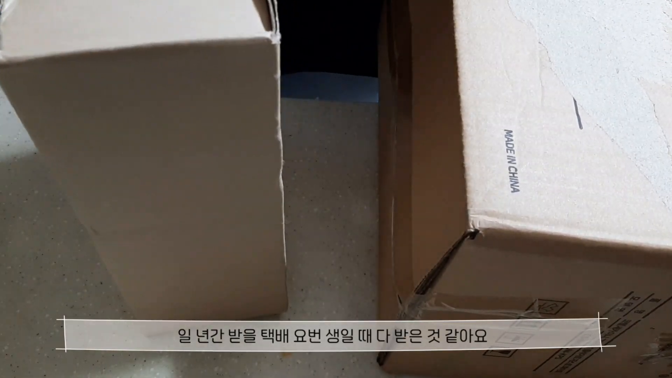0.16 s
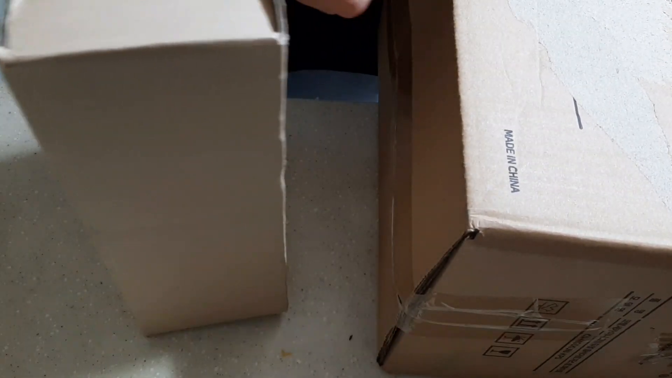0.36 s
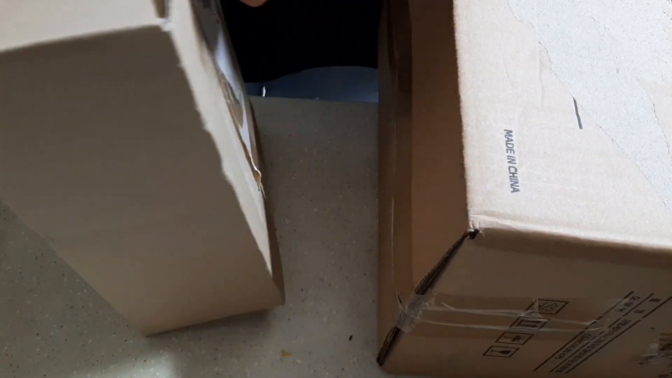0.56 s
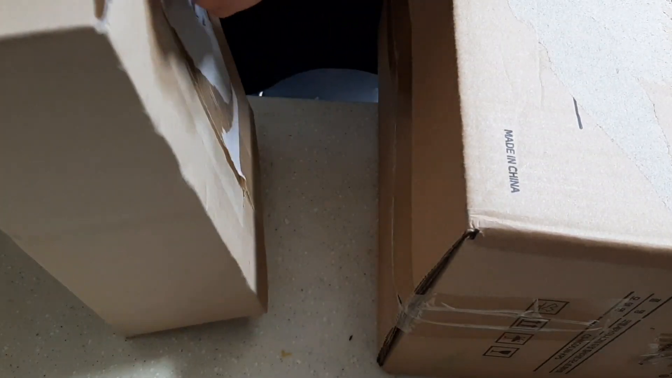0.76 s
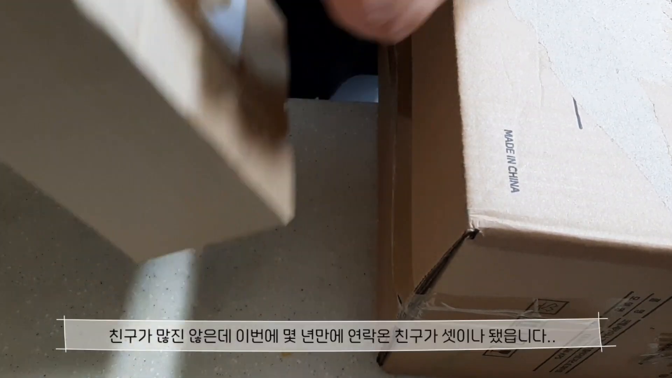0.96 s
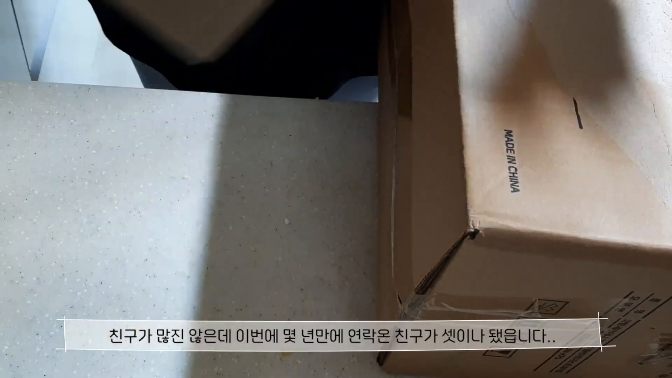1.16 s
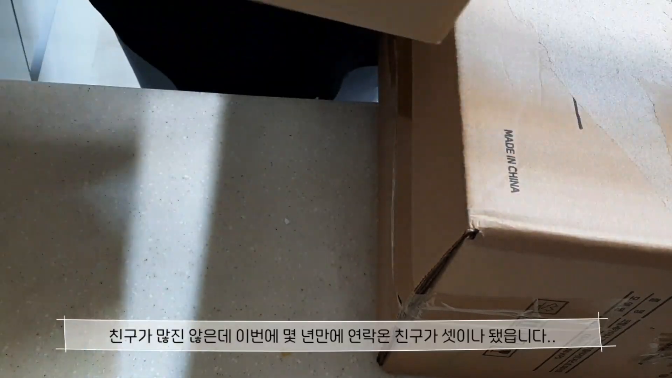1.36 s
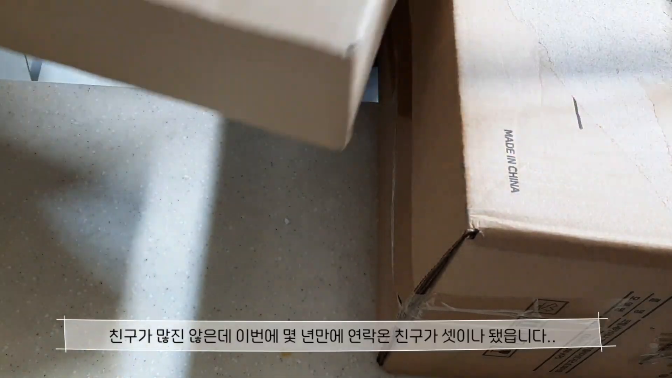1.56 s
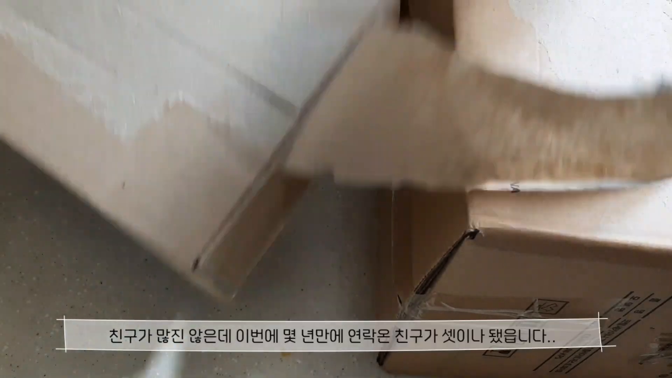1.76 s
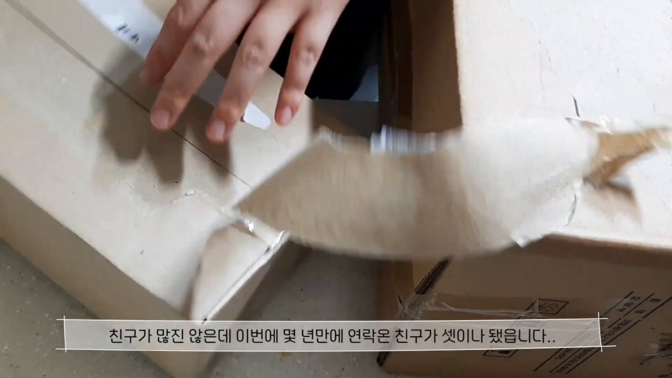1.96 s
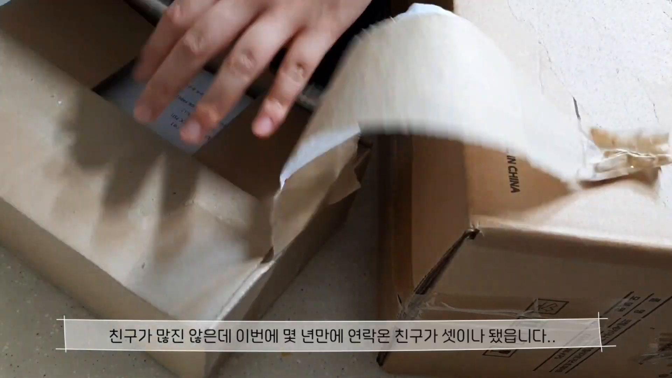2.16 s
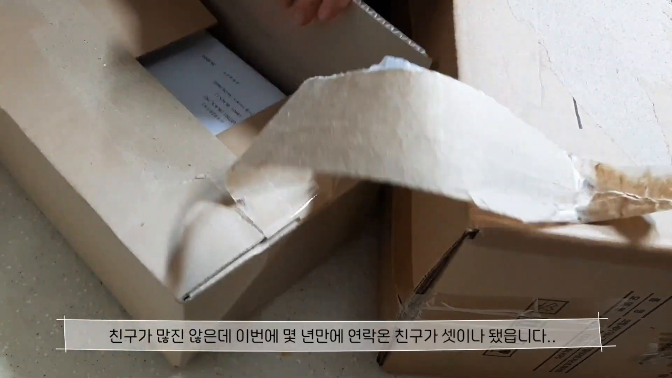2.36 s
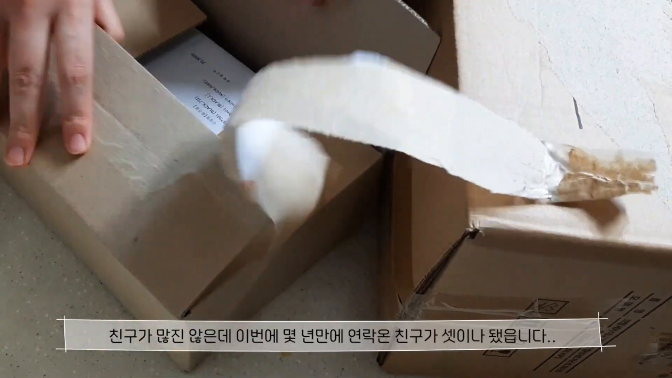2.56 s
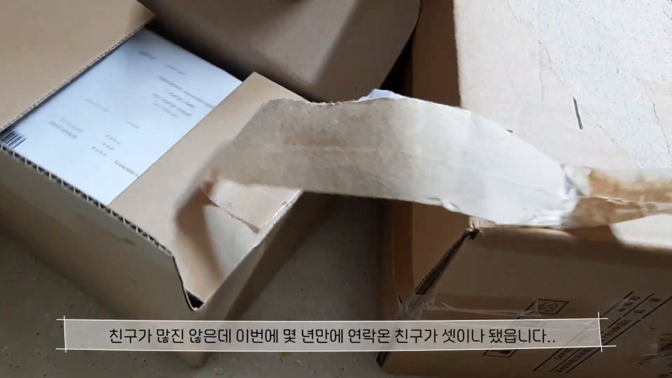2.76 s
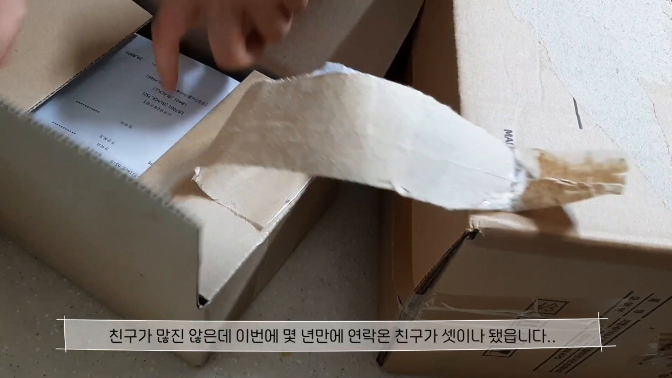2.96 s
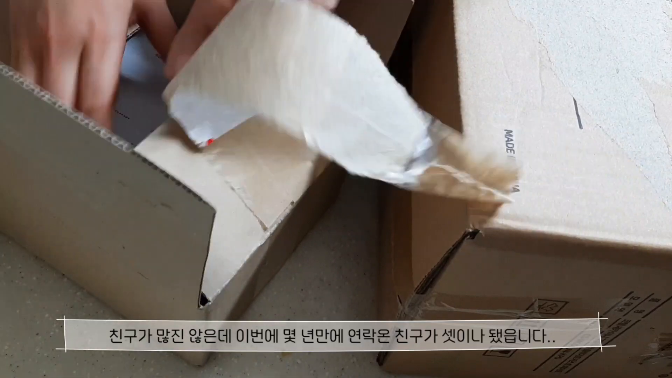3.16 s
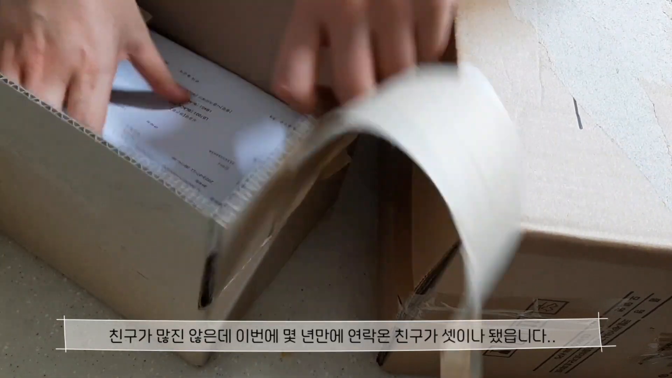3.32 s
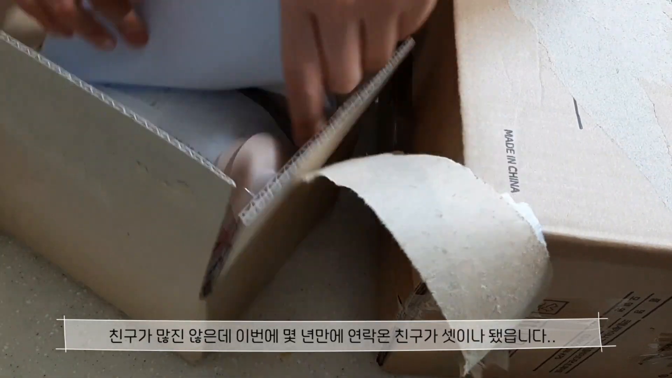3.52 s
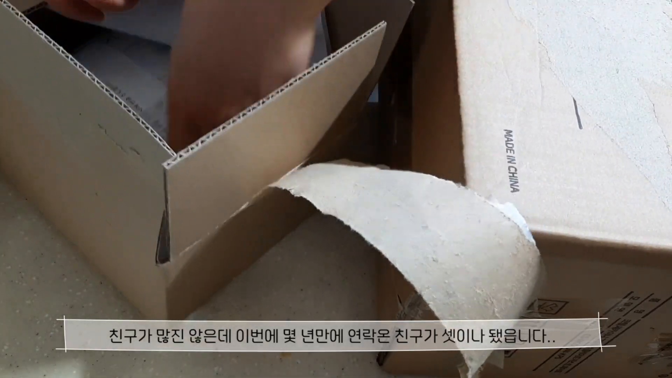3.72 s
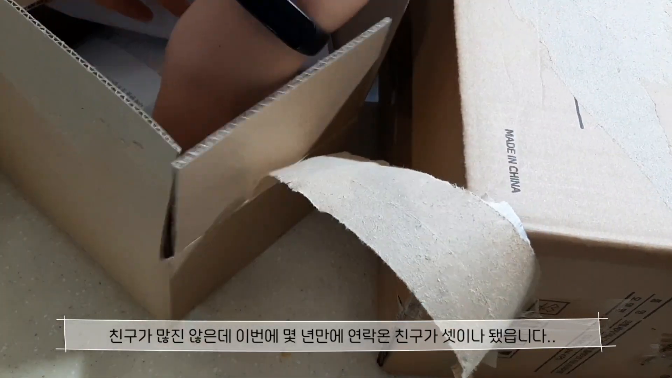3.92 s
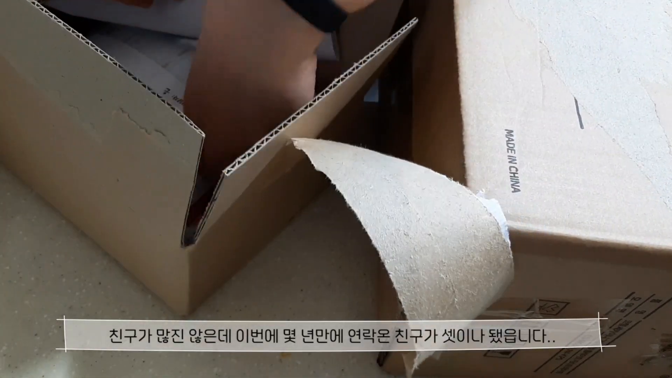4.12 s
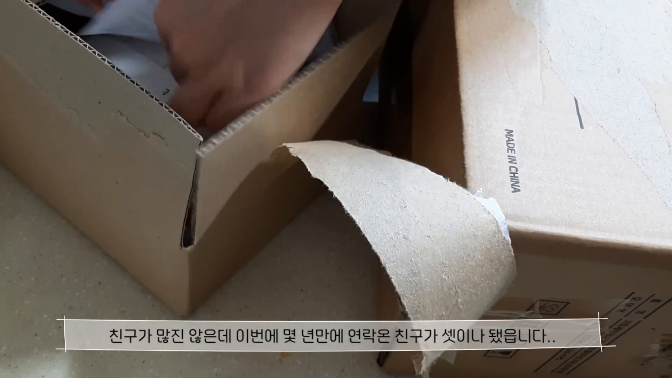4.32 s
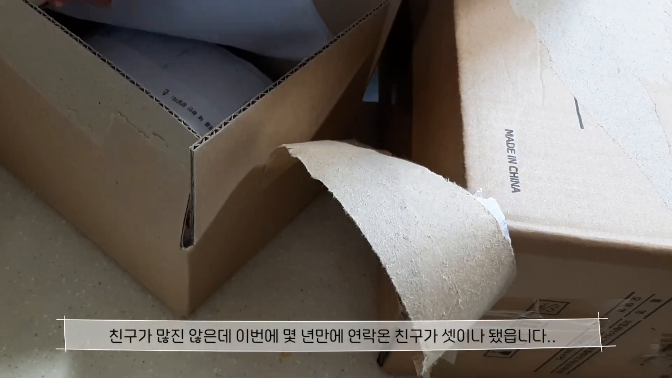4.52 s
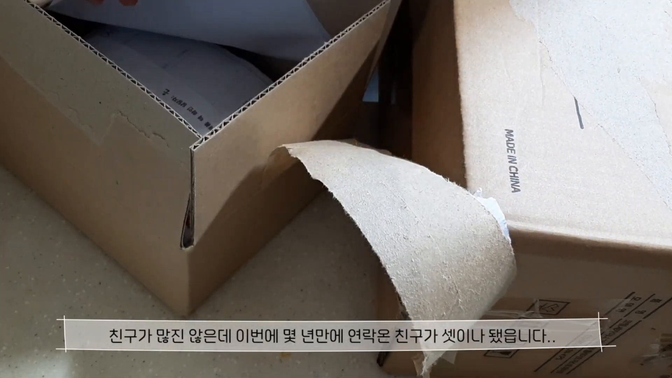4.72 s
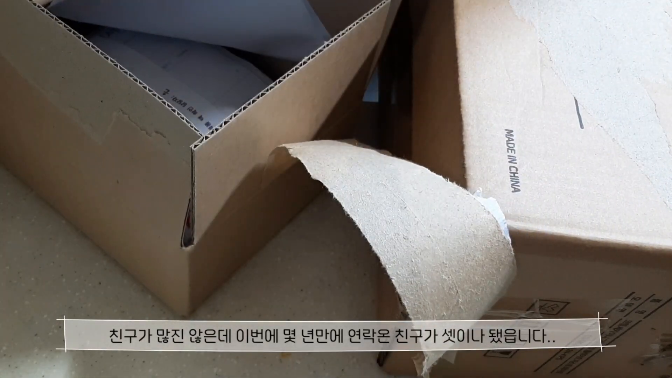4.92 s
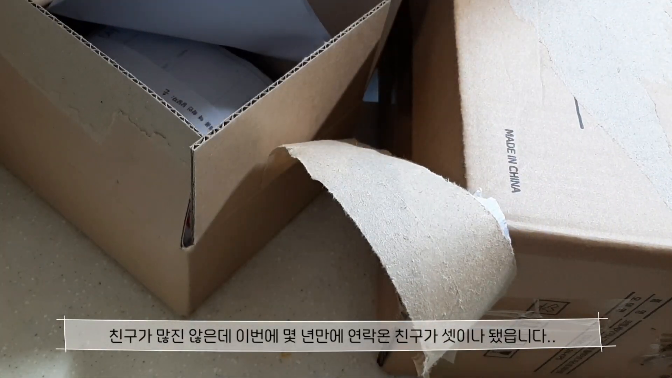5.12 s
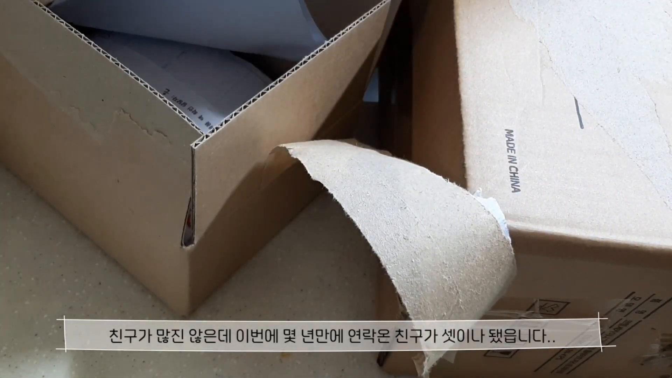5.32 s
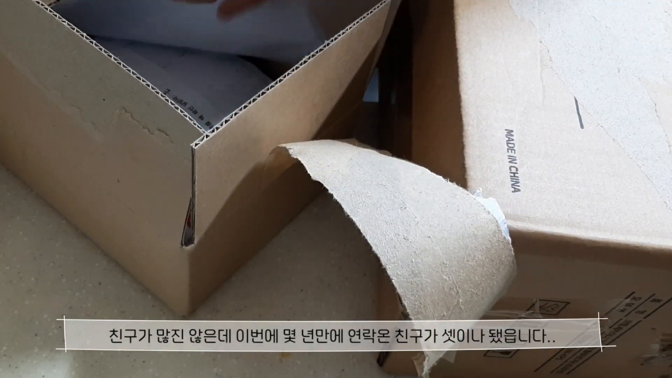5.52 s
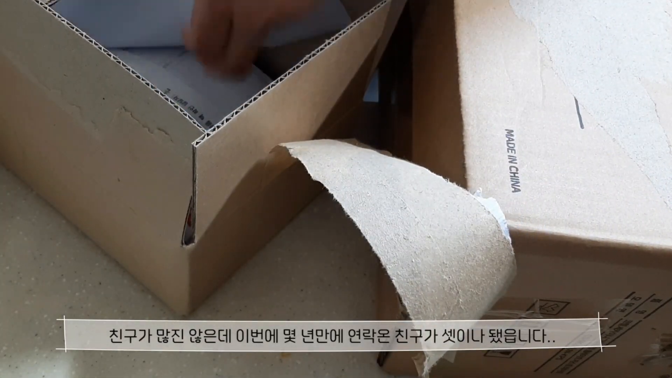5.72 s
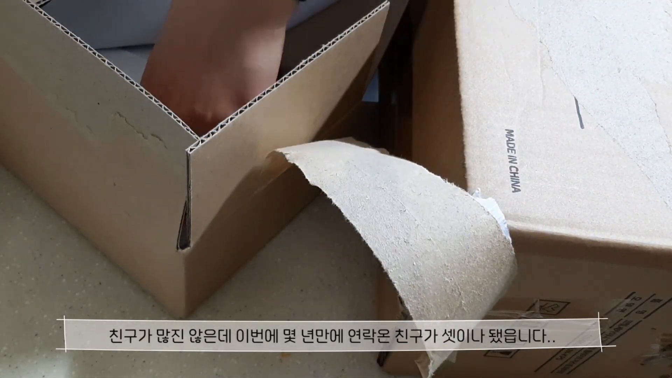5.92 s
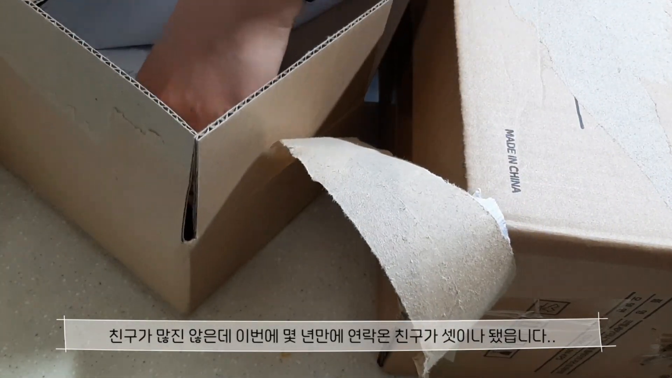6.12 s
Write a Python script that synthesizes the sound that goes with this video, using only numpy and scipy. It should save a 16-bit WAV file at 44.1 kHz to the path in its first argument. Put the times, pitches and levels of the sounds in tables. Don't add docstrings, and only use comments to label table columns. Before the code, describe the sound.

A cardboard box is dragged across a hard floor, thumped and opened with hollow knocks, tape snaps, then papery rustling and crinkling inside, close up.

```python
import sys
import numpy as np
from scipy import signal
from scipy.fft import rfft, irfft, next_fast_len
from scipy.io import wavfile
from scipy.ndimage import uniform_filter1d, map_coordinates

SR = 44100
rng = np.random.default_rng(int(sys.argv[2]) if len(sys.argv) > 2 else 0)


def invert_db(level):
    return 10 ** (np.asarray(level, dtype=float) / 20)


def unload_audio(sound):
    columns = np.transpose(np.atleast_2d(sound))
    steps = np.round(np.clip(columns, -1, 1) * 32767)
    wavfile.write(sys.argv[1], SR, steps.astype(np.int16))


N = 276948


def unit(x):
    return x / np.sqrt(np.mean(x ** 2) + 1e-20)


def steady(x, s):
    return x / np.sqrt(abs(uniform_filter1d(x[0] ** 2, int(s * SR))) + 1e-9)


def along(points, hz):
    f, v = np.transpose(points)
    return np.interp(np.log(hz + 1), np.log(f + 1), v)


def wobble(rate):
    knots = rng.standard_normal(int(N * rate / SR) + 4)
    return map_coordinates(knots, [np.arange(N) * rate / SR])


def filtered(x, response):
    m = next_fast_len(N + 8192)
    return irfft(rfft(x, m) * response(np.fft.rfftfreq(m, 1 / SR)), m)[..., :N]


# (frequency [Hz], left-right correlation [0 to 1])
LIKENESS = [(60, 0.85), (130, 0.96), (290, 0.99), (640, 0.75), (1400, 0.5), (3100, 0.35), (6800, 0.2),
            (15000, 0.1)]


def stereo(pair):
    lead_s = 0.00011

    def turn(hz):
        return np.arccos(np.clip(along(LIKENESS, hz), -1, 1)) / 2

    def shares(hz):
        return np.sqrt(2) * np.array([np.cos(turn(hz)), np.sin(turn(hz))])

    def lead(hz):
        return np.exp(1j * np.pi * np.outer([1, -1], hz * lead_s))

    mid, side = filtered(pair, shares)
    return filtered(np.array([mid + side, mid - side]) / np.sqrt(2), lead)


def strokes(rows):
    slope_db = 20
    peak, swell, fade, db = np.transpose(rows)[:4, :, None]
    t = np.arange(0, N + 32, 32) / SR
    before = np.insert(peak, 0, -1)[:-1, None]
    after = np.append(peak, N)[1:, None]
    away = 1000 * np.maximum((peak - t) / abs(swell), (t - peak) / abs(fade))
    power = invert_db(db - slope_db * away) ** 2 * (t > before) * (t < after)
    return power * power.max(0) / (power.sum(0) + 1e-30)


def summed(power, weight):
    return np.interp(np.arange(N) / 32, np.arange(power.shape[1]), weight @ power + 1e-30)


def fibres(per_s, share, patchy_db):
    catch = (rng.random(N) < per_s / SR) * invert_db(5 * np.minimum(rng.exponential(size=N), 3))
    grip = signal.lfilter([1], [1, -invert_db(-60 / (.006 * SR))], catch)
    z = signal.stft(rng.standard_normal((2, N)), nperseg=512)[2]
    patches = uniform_filter1d(rng.standard_normal(z.shape[1:]), size=5, axis=0)
    patches = uniform_filter1d(patches, size=12, axis=1)
    noise = signal.istft(z * invert_db(patchy_db * unit(patches)), nperseg=512)[1][:, :N]
    return (1 + share * grip) * noise


# (frequency [Hz], density [dB per Hz])
BOOM_SPECTRUM = [(20, -35), (60, -10.5), (120, -3), (250, -4.5), (480, -4.5), (750, -18), (1500, -52)]


def boom(centre_hz):
    lumps = invert_db(4.5 * wobble(70)) * rng.standard_normal((2, N))
    broad = unit(filtered(lumps, lambda f: invert_db(along(BOOM_SPECTRUM, f))))
    out = invert_db(-1.5) * (250 / centre_hz) ** 1.4 * broad
    for hz in (170, 230, 310, 420, 540):
        ring = filtered(lumps, lambda f: 1j * f / (hz * hz - f * f + .17j * f * hz))
        out += np.exp(-(np.log(centre_hz / hz) / 0.24) ** 2) * unit(ring)
    return steady(out, .04)


# (time [s], swell [ms], fade [ms], hiss level [dB], panel rasp over hiss [dB])
FINGER_STROKES = [
    (0.052, 5.2, 110, -68.5, 5),
    (0.336, 8.8, 30, -47.5, -1),
    (0.353, 21, 54, -58, 15),
    (0.463, 3, 90, -67, 21),
    (0.487, 53, 100, -60.5, 17.5),
]
FLOOR_STROKES = [
    (0.617, 140, 700, -60, -6),
    (0.854, 5.3, 55, -47, 3.5),
    (0.912, 200, 100, -49, -11),
    (0.992, 98, 200, -32.5, -2),
    (1.145, 400, 300, -35.5, -0.5),
    (1.2, 300, 250, -34, -3),
    (1.337, 250, 200, -33, -4),
    (1.424, 200, 36, -33, -2),
    (1.52, 400, 200, -71, 3),
]
TAPE_STROKES = [(1.602, 40, 150, -52.5, -11), (1.724, 150, 70, -52.5, -3), (1.897, 12, 250, -57, -2.5),
                (2.017, 9, 100, -59, 16), (2.057, 80, 150, -51, -1.5), (2.108, 5, 120, -46, 9),
                (2.19, 100, 302, -54, 7.5), (2.3, 50, 30, -52, 12.5), (2.404, 200, 75, -51.5, 1.5)]
FLAP_STROKES = [(2.633, 40, 900, -48.5, -2.5), (2.893, 1600, 24, -47, 4), (3.049, 80, 150, -59.5, 7),
                (3.201, 83, 50, -64.5, 20), (3.255, 7.3, 300, -47, 2), (3.316, 140, 900, -41.5, 0.5),
                (3.39, 440, 260, -41, 7.5), (3.46, 200, 200, -45.5, 6), (3.592, 97, 102, -40.5, 4)]
PAPER_STROKES = [(3.73, 21, 300, -66, 19), (3.82, 135, 220, -49, 3), (4.012, 66, 40, -51.5, 7),
                 (4.104, 240, 200, -53, -5), (4.254, 300, 400, -69.5, 13.5), (4.434, 260, 85, -53, 2.5),
                 (4.506, 9, 250, -61, 9.5), (4.583, 6.8, 75, -58, -2), (4.811, 170, 40, -60, 7),
                 (4.917, 8, 58, -56.5, 7), (5.045, 24, 400, -65, 0), (5.098, 300, 30, -63, -2),
                 (5.19, 40, 40, -67, -6), (5.29, 79, 50, -65.5, 1), (5.396, 51, 60, -61, -1)]
WRAP_STROKES = [(5.464, 41, 225, -45, -3), (5.567, 270, 8, -57, 7.5), (5.593, 5, 220, -53, 1.5),
                (5.64, 30, 450, -47, -10), (5.759, 740, 29, -49, 3.5), (5.79, 9, 120, -54, 5),
                (5.922, 66, 50, -43, -2.5), (5.973, 5, 300, -64, 15), (6.06, 21, 200, -59, -4),
                (6.201, 150, 300, -45, 1)]
GLOSS_DB = (-4, -0.5, -5, -3, -6.5, -6)
# (time [s], swell
# [ms], fade [ms], boom level [dB], centre frequency [Hz])
LEANS = [(0.01, 100, 500, -61, 198), (0.336, 5, 300, -47, 305), (0.395, 990, 40, -48.5, 320),
         (0.464, 4, 90, -39, 342), (0.489, 60, 75, -36, 352), (0.63, 100, 3000, -68, 204),
         (0.851, 6.4, 90, -41.5, 196), (0.971, 63, 900, -38, 238), (1.171, 790, 500, -32, 227),
         (1.45, 990, 65, -39.5, 197), (1.721, 100, 90, -51, 250), (1.95, 600, 900, -63, 290),
         (2.016, 5.4, 300, -29, 257), (2.06, 500, 70, -35, 259), (2.109, 5, 60, -23, 310),
         (2.296, 540, 100, -51, 228), (2.394, 170, 90, -39, 284),
         (2.58, 12, 3000, -46, 288), (2.745, 50, 50, -33.5, 358), (2.896, 3000, 40, -46.5, 340),
              (3.05, 160, 350, -47, 322), (3.3, 200, 900, -41.5, 400), (3.47, 220, 80, -33, 320),
              (3.61, 90, 98, -34, 310), (3.74, 27, 200, -43.5, 370), (3.82, 200, 270, -40.5, 338),
              (3.93, 140, 1100, -48.5, 400), (4.51, 1100, 130, -48, 290), (4.72, 55, 900, -59, 318),
              (4.955, 800, 90, -60, 272), (5.072, 150, 3000, -65.5, 290), (5.464, 50, 1500, -49, 285),
              (5.67, 40, 1100, -49.5, 322), (5.973, 3.5, 900, -36.5, 490), (6.04, 900, 59.6, -36, 460),
              (6.17, 180, 3000, -43, 387)]
# (start [s], end [s])
SMOOTH_SLIDE = (0.99, 1.47)
# (frequency [Hz], bandwidth [Hz], level [dB])
PANEL_MODES = [(646, 154, -1), (839, 98, 1.5), (1000, 81, 1), (1200, 127, 1.5), (1528, 95, 6),
               (2033, 140, 3.5), (2600, 680, -5.5)]
# (frequency [Hz], density [dB per Hz])
HISS_SPECTRUM = [(900, -26.5), (2200, -5), (3500, 0.5), (6000, -3), (8500, -4), (10500, -13.5)]
SHEEN_SPECTRUM = [(6500, -8.5), (9000, -5.5), (12500, 2), (16000, -11)]


def rubbing():
    leans = np.array(LEANS)
    weight = strokes(leans)
    shake = summed(weight, np.ones(len(leans)))
    centre_hz = summed(weight, leans[:, -1]) / shake

    surfaces = (FINGER_STROKES, FLOOR_STROKES, TAPE_STROKES, FLAP_STROKES, PAPER_STROKES, WRAP_STROKES)
    rubs = np.concatenate(surfaces)
    effort = strokes(rubs)
    gloss_db = np.repeat(GLOSS_DB, [len(s) for s in surfaces])

    def drive(over_db):
        return np.sqrt(summed(effort, invert_db(over_db) ** 2))

    t = np.arange(N) / SR
    crinkly = 1 - .6 * ((t > SMOOTH_SLIDE[0]) & (t < SMOOTH_SLIDE[1]))
    jerk_db = 1.5 * crinkly * wobble(45)

    def panels(f):
        total = 0
        for k, (centre, width, db) in enumerate(PANEL_MODES):
            mode = 1j * f * width / (centre * centre - f * f + 1j * f * width)
            total = total + (-1) ** k * invert_db(db) * mode
        return total

    def bottom_panel(f):
        return 450j * f / (600 ** 2 - f * f + 450j * f)

    rasp = steady(filtered(fibres(70, share=0.6 * crinkly, patchy_db=2.5), panels), 0.23)
    rasp += invert_db(2.0) * (1 - crinkly) * unit(filtered(rasp, bottom_panel))
    grain = fibres(180, share=0.45 * crinkly, patchy_db=2.3)
    hiss = drive(0 * gloss_db) * unit(filtered(grain, lambda f: invert_db(along(HISS_SPECTRUM, f))))
    hiss += drive(gloss_db) * unit(filtered(grain, lambda f: invert_db(along(SHEEN_SPECTRUM, f))))
    contact = invert_db(jerk_db) * (drive(rubs[:, -1]) * rasp + invert_db(1.5) * hiss)
    hollow = invert_db(0.2) * np.sqrt(shake) * boom(np.clip(centre_hz, 150, 600))
    return stereo(hollow + contact)


# (time [s], peak level [dB], frequency [Hz], upper mode level [dB])
PUSHES = [(0.333, -38, 170, -11), (0.465, -34, 386, 3), (0.847, -36, 182, -17), (0.98, -22, 169, -17),
          (1.1, -18, 194, -8), (1.428, -18.5, 182, -3), (1.696, -34, 228.3, -21), (1.93, -42, 377, -6),
          (2.013, -13, 200, -4), (2.1065, -6.5, 273, -1), (2.338, -19.5, 196, -14),
          (2.388, -15.5, 281, -14), (2.568, -25.5, 227, -18), (2.608, -17, 266, -36),
          (2.684, -31, 273, -16), (2.731, -18, 453, -13), (3.246, -25, 346, -18), (3.311, -28, 355, -4),
          (3.451, -20, 400, -12), (3.464, -12, 300, -8), (3.593, -23, 356, -35), (3.741, -27.5, 405, -20),
          (3.779, -24, 336, -18), (3.94, -34, 455, -18), (4.002, -28, 460, -18), (4.216, -40, 374, -10),
          (4.281, -41, 396, -10), (4.468, -25, 370, -16), (4.503, -26, 336, -5), (5.542, -22, 330, -12),
          (5.679, -19, 336, -20), (5.9712, -19, 265, 4), (6.106, -27, 318, -20)]


def knocks():
    out, t = np.zeros((2, N + SR)), np.arange(8192) / SR
    for s, db, hz, upper_db in PUSHES:
        t60 = 0.03 + 0.0006 * db
        phase = rng.uniform(0, 2 * np.pi, (3, 2, 1)) * [[[0], [1]], [[0], [1]], [[1], [1]]]
        upper = np.sin(2 * np.pi * 1.63 * hz * t + phase[1])
        upper += invert_db(-7) * np.sin(2 * np.pi * 2.3 * hz * t + phase[2])
        ring = invert_db(upper_db) * upper - np.sin(2 * np.pi * hz * t + phase[0])
        ring *= invert_db(12.5 - 60 * t / max(t60, .015)) * (1 - np.exp(-(t / 0.006) ** 2))
        thud = invert_db(-13 - 60 * t / 0.042) * (1 - np.exp(-(t / 0.0033) ** 2))
        thud *= np.sin(2 * np.pi * 110 * t)
        out[:, round(s * SR):][:, :len(t)] += invert_db(db) * (ring + thud)
    return stereo(out[:, :N])


# (time [s], peak level [dB],
# frequency [Hz], half length [ms])
SHUDDERS = [(0.377, -44.8, 172, 4.1), (0.475, -39.7, 463, 10.8), (0.481, -39.0, 248, 7.2),
            (0.488, -41.2, 711, 6.1), (0.5, -42.8, 614, 8.3), (0.515, -39.2, 161, 7.8),
            (0.887, -45.8, 172, 14.1), (0.963, -39.1, 248, 13.2), (0.983, -34.5, 818, 10.3),
            (0.988, -36.5, 495, 9.3), (0.991, -31.5, 161, 8.3), (1.006, -34.9, 248, 20.4),
            (1.017, -31.9, 474, 4.8), (1.031, -28.2, 215, 10.3), (1.035, -34.0, 818, 17.3),
            (1.077, -32.9, 183, 20.4), (1.116, -22.4, 194, 12.7), (1.134, -34.8, 678, 15.9),
            (1.143, -27.5, 291, 9.3), (1.185, -30.3, 205, 18.2), (1.224, -31.0, 506, 10.8),
            (1.226, -31.9, 172, 14.6), (1.248, -33, 400, 18), (1.26, -27.9, 215, 11.3),
            (1.298, -28.3, 183, 7.2), (1.327, -37.3, 183, 14.6), (1.353, -35.5, 172, 15.0),
            (1.384, -31.0, 172, 7.2), (1.424, -35.0, 603, 7.8), (1.72, -39.1, 248, 3.3),
            (2.018, -12, 300, 2.4), (2.055, -29.1, 258, 13.6), (2.169, -41.0, 280, 13.6),
            (2.299, -42.4, 678, 5.5),
            (2.652, -38.1, 377, 5.5), (2.737, -30.7, 151, 4.1), (2.745, -35.0, 506, 9.8),
                 (2.749, -35.4, 345, 9.8), (2.78, -38.0, 345, 3.0), (2.889, -41.6, 420, 6.7),
                 (3.032, -44.8, 355, 15.0), (3.051, -46.7, 538, 13.6), (3.054, -42.7, 334, 4.1),
                 (3.207, -43.5, 323, 7.2), (3.292, -41.6, 323, 12.7), (3.319, -34.2, 377, 5.5),
                 (3.336, -39.1, 280, 17.7), (3.342, -37.8, 624, 11.8), (3.365, -34.8, 269, 14.1),
                 (3.367, -36.4, 560, 6.1), (3.369, -38.4, 441, 14.6), (3.385, -32.2, 334, 4.1),
                 (3.385, -43, 1530, 22), (3.408, -39.6, 355, 12.7), (3.427, -32.0, 474, 4.8),
                 (3.506, -30.3, 291, 6.1), (3.58, -39.8, 409, 14.6), (3.621, -31.2, 355, 4.8),
                 (3.641, -37.5, 355, 15.9), (3.812, -37.4, 301, 10.8), (3.886, -41.8, 431, 7.8),
                 (3.892, -41.6, 560, 13.2), (3.906, -45.3, 420, 14.1), (4.096, -43.3, 323, 6.1),
                 (4.509, -39.3, 334, 6), (4.512, -47, 1980, 7), (5.065, -66, 810, 8), (5.28, -62, 1520, 5),
                 (5.474, -42.5, 258, 6.7), (5.494, -42.4, 280, 5.5), (5.732, -43.1, 323, 5.5),
                 (5.763, -45.1, 398, 8.8), (6.003, -30.1, 463, 11.3), (6.036, -37.1, 258, 20.4),
                 (6.036, -29.7, 484, 4.1), (6.056, -36.8, 226, 14.6), (6.057, -36.9, 452, 13.6),
                 (6.135, -37.8, 474, 3.3), (6.136, -41.8, 312, 7.8), (6.172, -38.4, 355, 15.0),
                 (6.188, -38.8, 355, 13.6), (6.216, -40.5, 452, 12.2), (6.266, -40.9, 301, 8.3),
                 (6.272, -39.1, 517, 4.1)]


def shudders():
    out, t = np.zeros((2, N + SR)), np.arange(-3072, 3072) / SR
    for s, db, hz, half_ms in SHUDDERS:
        ring = np.sin(2 * np.pi * (hz * t + rng.random((2, 1))))
        swell = np.exp(-(1000 * t / half_ms) ** 2)
        out[:, round(s * SR):][:, :len(t)] += invert_db(db + 1.5) * swell * ring
    return stereo(out[:, 3072:N + 3072])


# (time [s], peak level [dB], dull part [dB], bright
# part [dB])
SNAPS = [(0.052, -41.5, 1.5, -25), (0.336, -34.5, -19, -23), (0.4822, -35.5, 11.5, -6),
         (0.6184, -38, -14, 7), (0.8527, -24, -19.5, -18), (1.5803, -40.5, -38, -11),
         (1.6296, -32, -36, -12), (1.682, -19, -25, -14), (1.718, -22, -11.5, -14),
         (1.8978, -40.5, -5, -25), (1.9642, -35, -4, -20), (2.046, -29, -12, 0),
         (2.0968, -35, -2, -19), (2.387, -38, 6, -24), (2.41, -27.5, -16, -4.5), (2.627, -42, -12, 6),
         (3.255, -36, -7, 6), (3.3787, -33, -5, 1), (3.4078, -27.5, -19, -2), (3.487, -35.5, 10, 0),
           (3.5493, -38, 0, -16), (3.5866, -26.5, 2, -16), (4.008, -34, -5, -8), (4.0838, -38, -1, -7),
           (4.099, -35, -1.5, -5), (4.131, -31.5, 2.5, -1), (4.189, -35.5, 5, 1), (4.3506, -32.5, -6, -9),
           (4.393, -39.5, -8, -2), (4.43, -33, -11, -9), (4.5043, -37, 6, -7), (4.582, -32.5, -10, 3),
           (4.7608, -36, -29, -7), (4.781, -40.5, -17, -15), (4.8812, -42, -14, -15), (4.913, -41, -3, -25),
         (5.439, -39, -14, -8), (5.5642, -37, -3, -23), (5.592, -31, -23, -5), (5.6107, -31, -26, -6),
            (5.6512, -33.5, -20, -13), (5.8218, -36, -33, -12), (5.9108, -30, -26, -6), (5.972, -36, 8, -1),
            (6.0529, -26, -11, -4.5), (6.1515, -34.5, -1, -7), (6.1758, -31.5, -0.5, -5),
            (6.1924, -25, -12, -1), (6.263, -27.5, -10, -3)]
# (time [s], peak level [dB], dull part [dB])
TICKS = [(0.2987, -63, 0), (0.5302, -44, -5), (0.5424, -46, -8), (0.5995, -42, -20), (0.6923, -43, -17),
         (1.6038, -40, -22), (1.9255, -41, -10), (1.9854, -42, -6), (2.3411, -38, -10), (3.2924, -36, 0),
         (3.4494, -34, 6), (3.4685, -33, -9), (3.5034, -35, 9), (3.5628, -29, 4), (3.9878, -40, -6),
         (4.0662, -42, -6), (4.1619, -41, -4), (4.221, -48, 8), (4.2782, -46, -2), (4.338, -46, 6),
         (4.5521, -45, 3), (4.813, -47, 2), (4.8569, -48, -15), (5.253, -53, -10), (5.3647, -52, -15),
         (5.3926, -47, -13), (5.4849, -33, -17), (5.6366, -38, -12), (5.7912, -44, -4), (5.8022, -41, -4),
         (5.9254, -34, -3), (6.0955, -43, -8), (6.2124, -33, -8), (6.2274, -34, -2)]


def snaps():
    out, t = np.zeros((2, N + SR)), np.arange(4096) / SR
    hz = np.fft.rfftfreq(len(t), 1 / SR)
    crack = 1.3 * invert_db(-60 * t / .0075) * (1 - np.exp(-t / .0007))
    rustle = invert_db(-16.5 - 60 * t / 0.045) * (1 - np.exp(-t / 0.0016))
    ticks = [(*tick, -4) for tick in TICKS]
    for s, db, dull_db, bright_db in SNAPS + ticks:
        spectrum = [(450, dull_db - 36), (1400, dull_db + 9.0), (4500, 0.0023), (12500, bright_db)]
        colour = invert_db(along(spectrum, hz))
        noise = irfft(rfft(rng.standard_normal((2, len(t)))) * colour)
        noise /= np.sqrt(np.mean(colour[(hz > 2500) & (hz < 9000)] ** 2))
        out[:, round(s * SR):][:, :len(t)] += invert_db(db + 7.8) * (crack + rustle) * noise
    return stereo(out[:, :N])


def panned(x, pan_db):
    return x * invert_db(np.array([pan_db / 2, -pan_db / 2]))


def walls(x):
    t = np.arange(4096) / SR
    tail = invert_db(-60 * t / 0.11) * (t > .0015) * rng.standard_normal((2, len(t)))
    wet = signal.fftconvolve(x, tail / np.linalg.norm(tail[0]), axes=1)[:, :N]
    return filtered(wet, lambda f: 1j * f / (500 + 1j * f))


# (frequency [Hz], density [dB per Hz])
AIR_SPECTRUM = [(20, -16), (129, -15), (173, -5.5), (227, -16), (482, -48), (7300, -36.5), (9100, -48),
                (11500, -38), (15500, -34)]


def air():
    noise = filtered(rng.standard_normal((2, N)), lambda f: invert_db(along(AIR_SPECTRUM, f)))
    return invert_db(-64) * unit(stereo(noise))


# (time [s], left minus right [dB])
HAND_PLACE = [
    (0.0, -2),
    (0.4, 0.0),
    (1.26, -1),
    (1.64, -2.5),
    (2.22, 0.0),
    (3.97, 1),
    (4.39, 1),
    (6.28, 2),
]


def scene():
    pan_db = np.interp(np.arange(N) / SR, *np.transpose(HAND_PLACE))
    box = panned(rubbing() + snaps() + knocks() + shudders(), pan_db)
    return box + invert_db(-10.5) * walls(box) + air()


def band_limit(x):
    return signal.sosfilt(signal.butter(12, 16800, fs=SR, output="sos"), x)


# (frequency [Hz], level [dB])
MIC_RESPONSE = [(20, -0.5), (8100, 0), (8500, -10.5), (9300, -5.5), (11500, -0.5), (15800, 0.5),
                (15980, -23), (16700, -45), (16900, -84)]


def record(dry):
    def response(f):
        facing_db = np.outer([-1, 1], 1.2 * f / 12000)
        return invert_db(along(MIC_RESPONSE, f) + facing_db)

    mix = filtered(dry, response)
    return band_limit(mix)


dry = scene()
out = record(dry)
unload_audio(out)
```